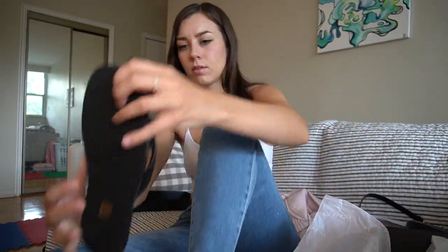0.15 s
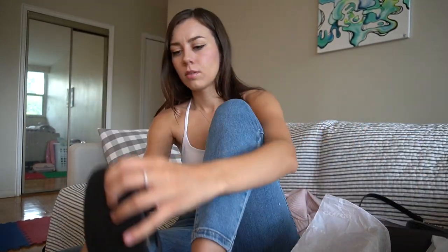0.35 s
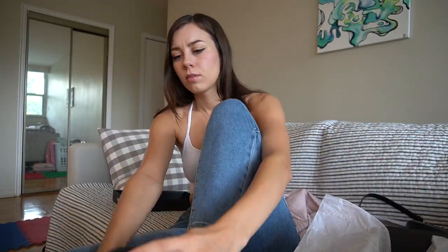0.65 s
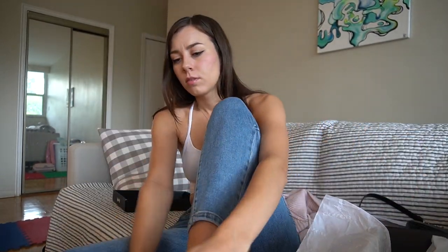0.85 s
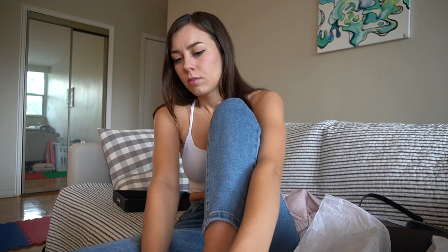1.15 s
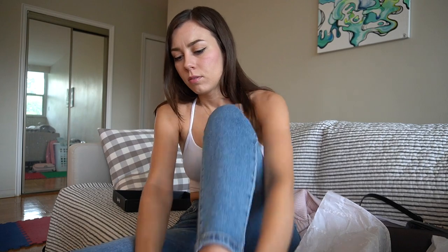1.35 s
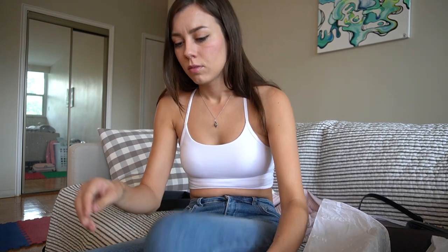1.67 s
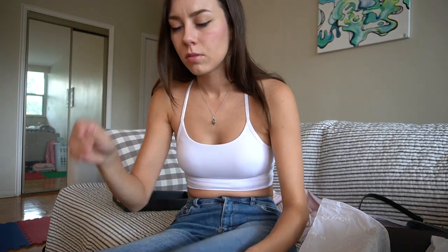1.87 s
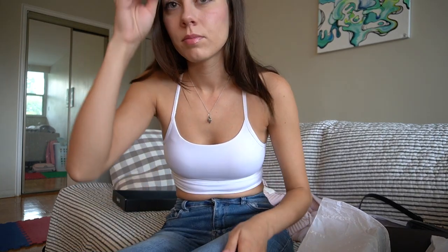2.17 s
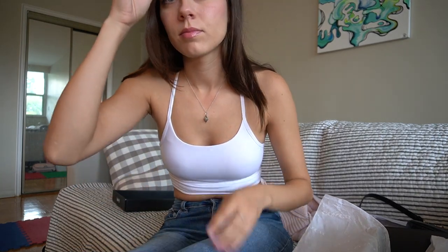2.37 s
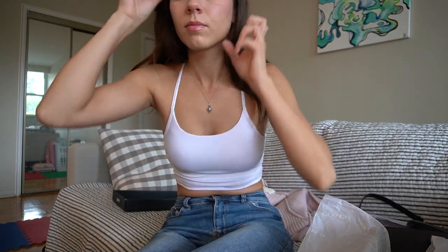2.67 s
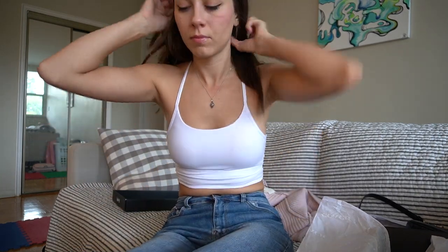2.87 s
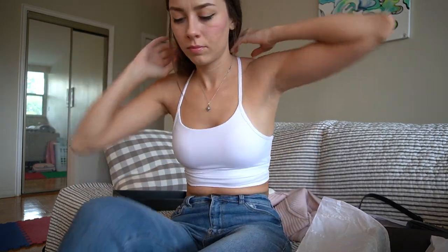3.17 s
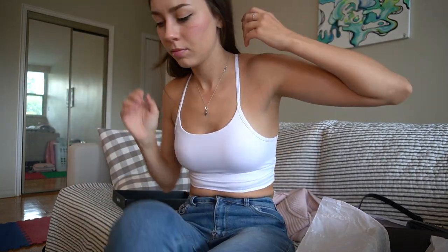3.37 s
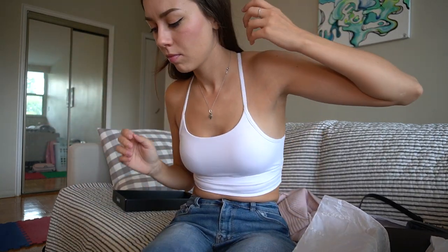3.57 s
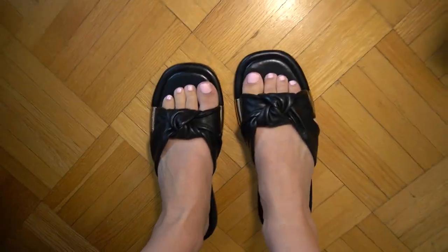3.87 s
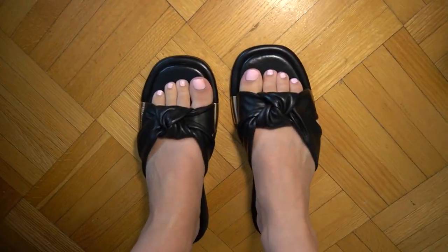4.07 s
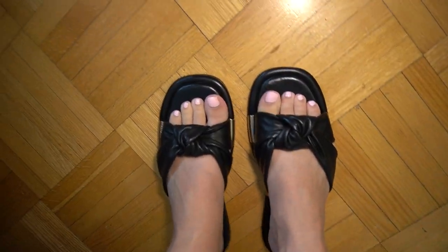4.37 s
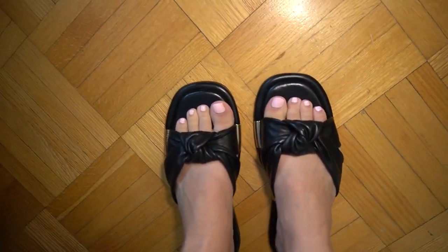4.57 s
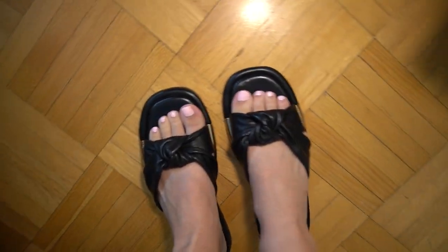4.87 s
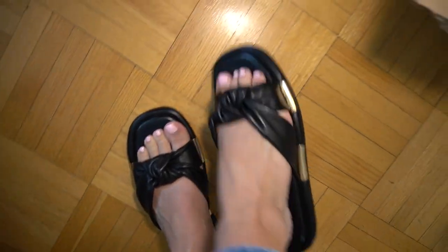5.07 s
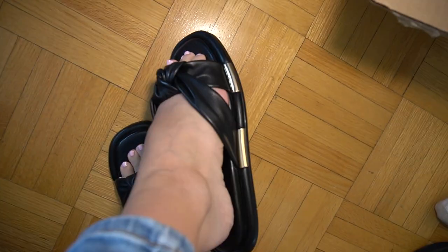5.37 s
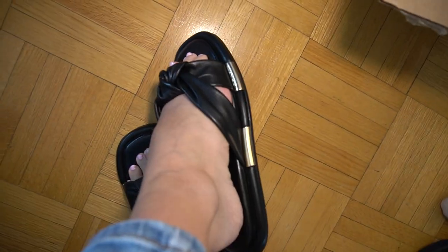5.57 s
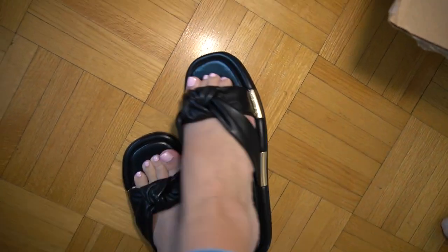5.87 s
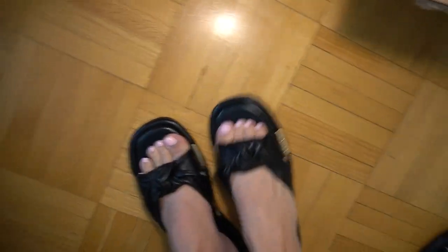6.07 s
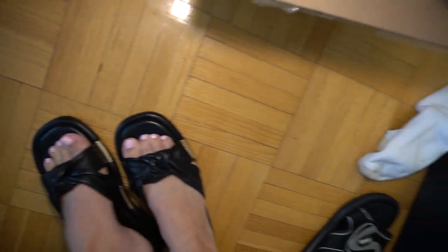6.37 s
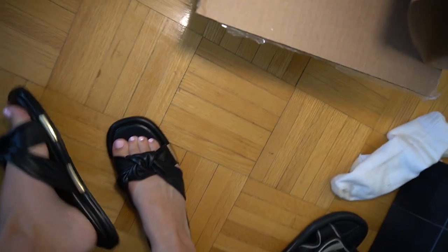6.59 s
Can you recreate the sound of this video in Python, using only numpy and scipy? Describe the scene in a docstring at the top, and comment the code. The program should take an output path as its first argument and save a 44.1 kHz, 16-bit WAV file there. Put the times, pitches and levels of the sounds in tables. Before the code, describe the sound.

Fairly close microphone indoors: dry fabric rubbing and tiny clicks, then several hard, flat sandal slaps on wood, the biggest near two seconds, with short bright room reverberation and lingering ringing. Quieter hair and cloth rustles lead to another clack. The sound switches abruptly to a hand-held camera, with deep swaying rumble and muffled bumps, sparse ticks, a sole slap and light shuffling.

```python
"""Cloth and hair rustle over a low rumble amid small ticks: someone on a sofa pulls on soft-soled sandals.
The soles then slap on a parquet floor and ring; the second sandal's slap fills the room with a noisy burst.
A second scene follows at once: a hand-held camera above the feet sways and rumbles as they brush and thud.
Rubbing is noise shaped by gestures; slaps are damped modes and sharp contacts in a dense reverberant room;
narrow-band noise sings, rings on or groans; a drone and hiss lie beneath."""
import sys
import numpy as np
from scipy import signal
from scipy.fft import rfft, irfft
from scipy.io import wavfile
from scipy.ndimage import uniform_filter1d

SR = 44100
rng = np.random.default_rng(int(sys.argv[2]) if len(sys.argv) > 2 else 0)


def dump(signal):
    """Clip the signal to [-1, 1] and save it as 16-bit WAV at the path in sys.argv[1]."""
    limited = np.clip(np.atleast_2d(signal).T, -1, 1)
    pcm = np.round(limited * 32767).astype(np.int16)
    wavfile.write(sys.argv[1], SR, pcm)


N = 296793
TIME = np.arange(N) / SR
CUT_S = 3.859  # the seated scene ends and the hand-held scene begins


def amp(db):
    """Level law: decibels become an amplitude ratio."""
    return 10 ** (np.asarray(db) / 20)


def unit(x):
    """Normalisation: scales a signal to rms 1."""
    return x / np.sqrt(np.mean(x ** 2) + 1e-20)


def read(points, hz):
    """Logarithmic frequency scale: interpolates a curve along it."""
    f, value = np.transpose(points)
    return np.interp(np.log(hz + 1), np.log(f), value)


def levels(rows):
    """Amplitude envelopes: one gain curve per dB column, silent outside the rows' span."""
    s, *columns = np.transpose(rows)
    inside = 1. * ((TIME > s[0] - .022) & (TIME < s[-1] + .022))
    inside = uniform_filter1d(inside, size=600)
    return [inside * amp(np.interp(TIME, s, db)) for db in columns]


def add(mix, s, sound):
    """Superposition: adds a sound into the mix from time s."""
    part = mix[max(round(s * SR), 0):][:len(sound)]
    part += sound[:len(part)]


def coloured(x, points):
    """Linear filtering: weights the spectrum of x, then scales it to rms 1."""
    gain = amp(read(points, np.fft.rfftfreq(len(x), 1 / SR)))
    return unit(irfft(rfft(x) * gain, len(x)))


def noise(points):
    """Stationary noise: white noise filtered to a spectrum, at rms 1."""
    return coloured(rng.standard_normal(N), points)


def ring(t, hz, t60, build_cycles=.5):
    """Damped mode: a sinusoid that builds up over its first cycles and decays exponentially."""
    t = np.maximum(t, 0)
    build_up = 1 - np.exp(-t * hz / build_cycles)
    return np.sin(2 * np.pi * hz * t) * amp(-60 * t / t60) * build_up


def crack(t, decay_s, low_hz, high_hz, grit):
    """Impulsive excitation: one sharp contact amid a dying spray of micro-contacts, band-limited."""
    burst = grit * rng.standard_normal(len(t)) * np.exp(-t / decay_s)
    burst[8] += 1  # the main contact
    band = [low_hz, min(high_hz, .45 * SR)]
    return unit(signal.sosfilt(signal.butter(2, band, "band", fs=SR, output="sos"), burst))


def swell(s, rise, fall):
    """Gesture envelope: a movement gathers speed until time s and then slows."""
    drop_db, shape = 10.5, 0.96  # the drop one rise before and one fall after the peak
    away = np.maximum((s - TIME) / rise, (TIME - s) / fall)
    gain, near = np.zeros(N), (away >= 0) & (away < 4)
    gain[near] = amp(-drop_db * away[near] ** shape)
    return gain


# Decay time of the room: (frequency [Hz], t60 [s])
ROOM_DECAY = [(200, 0.5), (1000, 0.34), (2500, 0.5), (5000, 0.5), (10000, 0), (16000, 1.4)]
# Spectrum of the room's reflections: (frequency [Hz], level [dB])
ROOM_SPECTRUM = [(150, 5), (500, -7.5), (1050, -3.5), (1450, -14), (1900, -0.5), (2400, 0), (3100, -6.5),
                 (4500, -0.5), (9000, 0), (16000, -5)]


def room(x):
    """Diffuse reverberation: dense random reflections, each band decaying at its own rate."""
    taps = rng.standard_normal(SR) * (np.arange(SR) > .006 * SR)
    hz, t, z = signal.stft(taps, SR, nperseg=256)
    early = 1 + 1.8 * np.exp(-t / 0.0044)
    decay_db = 60 * t / read(ROOM_DECAY, hz)[:, None]
    z = z * early * amp(read(ROOM_SPECTRUM, hz)[:, None] - decay_db)
    tail = signal.istft(z, SR, nperseg=256)[1]
    return signal.fftconvolve(x, tail / np.linalg.norm(tail))[:N]


# A sole slaps the floor: (time [s], direct peak level [dB], smack pitch [Hz], hollow ring re smack [dB],
# crack re smack [dB], time to roll flat [s], top of the crack, at least 2500 [Hz])
SOLE_SLAPS = [(1.1399, -6.5, 1470, -33, -1.5, 0.00065, 7540), (1.5984, -21.5, 610, -4, -18, 0.0017, 4000),
              (1.7898, -8, 1910, -18, -3, 0.00075, 8000), (1.7914, -0.5, 1740, -1.5, -3, 0.0013, 5000),
              (1.8244, 9, 1150, -9, -2.5, 0.001, 8200), (1.9618, -2.5, 1400, -21, -4, 0.00049, 7500),
              (1.9630, -10, 640, -3, -18, 0.00092, 3470), (2.1827, -5.5, 1540, 5.5, -7, 0.00086, 4000),
              (2.185, -3.5, 1240, 2, -11, 0.0022, 4260), (2.295, -15, 1700, -15, -7, 0.003, 4000),
              (2.299, -9, 1080, 15, -11, 0.0012, 4500), (2.407, -8.5, 1380, 3.5, -6, 0.0016, 5640),
              (2.479, -14.5, 1120, 6, -8, 0.0014, 5100), (2.5211, -2, 1100, 7.5, 5.5, 0.00037, 10000),
              (3.36, -13.5, 1030, -3, -21, 0.001, 4000), (3.3686, -10.5, 603, 8, -15, 0.0011, 4030),
              (3.489, -19, 810, -5, -18, 0.0026, 5000), (3.599, -17.5, 940, 9, 1, 0.0033, 7000),
              (3.7804, 4, 1120, 5, 2.5, 0.0017, 4480), (5.2045, 4, 1540, -12, -13.5, 0.00051, 4500),
              (5.972, -32, 700, -8, -22, 0.0011, 3500), (5.985, -32, 620, -14, -22, 0.0017, 3500),
              (6.0223, -25, 404, -6, -3, 0.0027, 3530), (6.205, -28, 770, -18, 0, 0.0023, 4000),
              (6.235, -21, 970, -25, -4, 0.0029, 4030), (6.2897, -17.5, 1110, -18, -9, 0.0011, 4500),
              (6.6732, -7.5, 710, 4, -19, .0007, 3520)]
# Modes of a sole on parquet: (frequency [Hz], level [dB], t60 [s])
SOLE_MODES = [(453, 5, 0.032), (592, 15.5, 0.01), (830, 12, 0.014), (1110, 8.5, 0.013), (1660, 3, 0.018),
              (2310, -2, 0.014)]
# Reflections of each slap from nearby furniture: (delay [s], level re direct [dB])
FURNITURE_ECHOES = [(.0055, -25), (.013, -28)]


def slaps(rows):
    """Impact and modal response: heel, arch and toe squeeze out air, the sole rings, its edge cracks."""
    landings = ((0, 1), (.42, .45), (1, 0.18))  # heel, arch, toe: (share of the roll, force)
    t, out = np.arange(2000) / SR, np.zeros(N)
    for s, db, hz, ring_db, crack_db, roll, top_hz in rows:
        smack = unit(sum(force * ring(t - lag * roll, hz, 5.15 / hz) for lag, force in landings))
        sole = unit(sum(amp(mode_db) * ring(t, f, t60) for f, mode_db, t60 in SOLE_MODES))
        edge = crack(t, decay_s=0.0017 + 0.46 * roll, low_hz=1870, high_hz=max(top_hz, 2500), grit=0.21)
        hit = smack + amp(ring_db) * sole + amp(crack_db) * edge
        add(out, s, amp(db) * hit / abs(hit).max())
    echoes = np.zeros(N)
    for delay, db in FURNITURE_ECHOES:
        add(echoes, delay, amp(db) * out)
    return out + echoes + amp(-8.5) * room(out)


# Straps, toes and sole edges tick; some rows are echoes and rings of slaps:
# (time [s], direct peak level [dB], pitch [Hz], crack re ring [dB], t60 of the ring [cycles])
SMALL_TICKS = [(0.038, -22, 3600, -6, 8), (.055, -20, 3900, -4, 7.1), (0.403, -35, 4500, -5, 8),
               (.483, -24, 3480, 1, 7.2), (0.491, -26, 5000, 8, 8), (.573, -39, 4000, 3, 8),
               (.767, -16, 2790, -7, 6.8), (.882, -14, 3740, -8, 6.8), (0.894, -11.5, 3830, -10, 6.6),
               (0.919, -12.5, 1610, 3, 7.9), (0.929, -17, 1660, -7, 6.5), (.963, -24, 1900, -5, 5.7),
               (.973, -23, 1650, -9, 6), (.988, -22, 1500, -5, 3.9), (1.041, -22, 900, -2, 4),
               (1.2540, -14, 1570, 5, 8.7), (1.356, -11, 7000, 0, 7.8), (1.3632, -3.5, 3560, 5, 16),
               (1.415, -17, 3000, 0, 6), (1.467, -25, 7500, 9, 7.3), (1.476, -23, 4050, 8, 8.7),
               (1.696, -27, 4000, 4, 8), (1.8126, -20.5, 5550, 7, 8), (1.835, -11, 6000, 4, 8),
               (1.8505, -8, 2300, 0, 6), (1.86, -5, 1300, -2, 6), (1.867, -9, 2700, -4, 6),
               (1.8925, -15, 2520, -4, 8), (2.028, -22, 6000, 2, 8), (2.224, -15, 4200, 25, 8),
               (2.394, -21, 3300, 7, 8), (2.662, -20, 4500, 5, 8), (2.685, -21, 4200, -2, 5.2),
               (2.7454, -12, 3320, 0.5, 13), (2.759, -14.5, 3060, -1, 13), (3.029, -14.5, 5700, -6, 6.6),
               (3.043, -18.5, 2900, 3, 10.3), (3.379, -22, 8000, 7, 5.5), (3.417, -22, 1490, -16, 7.2),
               (3.768, -9.5, 7000, 11, 8), (3.794, -11, 7800, -8, 9.3), (3.8564, -3, 2620, -1, 9.3),
               (4.2255, -23, 4500, 2, 4.1), (4.9782, -13, 7500, 5, 9), (5.001, -14, 2440, 13, 8),
               (5.009, -20, 11500, 4, 8), (5.2085, -17, 1880, -15, 16), (5.2158, -15, 2890, -7, 17),
               (5.2185, -20, 1850, -10, 15), (5.515, -29, 5000, 2, 8), (5.5306, -23.5, 2950, 5, 8),
               (5.7290, -17.5, 1820, 8, 5.3), (6.021, -20, 1530, 4, 9.6), (6.1431, -20, 1320, -21, 8.4),
               (6.154, -16.5, 1700, -17, 5.3), (6.183, -18, 1500, -4, 6), (6.324, -27, 7040, 11, 6.7),
               (6.342, -16.5, 2640, -8, 7.3), (6.418, -6, 4250, -10, 11), (6.575, -24, 5800, -9, 12),
               (6.615, -26, 5900, -7, 12), (6.6494, -17, 2710, -14, 7.7), (6.7053, -17.5, 1840, -1, 9.5)]


def ticks(rows):
    """Damped mode with a contact transient: a short ring and a crack; a longer ring starts more softly."""
    t, out = np.arange(800) / SR, np.zeros(N)
    for s, db, hz, crack_db, cycles in rows:
        tone = unit(ring(t, hz, cycles / hz, build_cycles=0.13 * cycles))
        contact = crack(t, decay_s=0.003, low_hz=1720, high_hz=10600, grit=0.18)
        tick = tone + amp(crack_db) * contact
        add(out, s, amp(db) * tick / abs(tick).max())
    return out + amp(-20.0) * room(out)


# Dull bumps of feet on the floor, weight on the sofa and hands on the camera:
# (time [s], direct peak level [dB], pitch [Hz], t60 of the swing [cycles])
DULL_BUMPS = [(0.427, -26.5, 70, 5.9), (2.235, -13, 122, 18), (2.29, -14, 104, 8.4), (2.308, -17, 162, 18),
              (2.415, -21, 188, 19), (4.146, -20.5, 66, 5.9), (4.434, -8.5, 57.3, 4.6),
              (4.645, -11, 65.6, 8.4), (4.731, -31, 370, 7.3), (4.872, -12, 60.7, 7.7),
              (5.015, -17, 69, 11), (5.2046, -18, 134, 3.2), (5.972, -14.5, 79, 6), (6.021, -5, 72.3, 5),
              (6.022, -11.5, 155, 4.4), (6.318, -23, 79, 5.7), (6.67, -27, 169, 4.8)]


def thuds(rows):
    """Low-frequency damped oscillation: a soft bump swings for a few cycles."""
    t, out = np.arange(SR // 3) / SR, np.zeros(N)
    for s, db, hz, cycles in rows:
        swing = ring(t, hz, cycles / hz)
        add(out, s, amp(db) * swing / abs(swing).max())
    return out + amp(-21.0) * room(out)


def grains(grains_per_s, spread_db, smooth, clump_db):
    """Granular noise: countless uneven grains, as of tiny slips, clump together over a smooth hiss."""
    sizes = amp(spread_db * np.minimum(rng.exponential(1, N), 4)) * rng.choice([-1, 1], N)
    impulses = unit(sizes * (rng.random(N) < grains_per_s / SR))
    clumps = noise([(5, 6.0), (40, -6.0), (120, -11), (400, -59), (2000, -90)])
    return (impulses + smooth * rng.standard_normal(N)) * amp(clump_db * clumps)


# The noisy burst as the second sandal slaps down, before a 1 dB lift: (time [s], level [dB])
BURST_LEVEL = [(1.821, -29.5), (1.828, -15), (1.844, -23.5), (1.851, -13.5), (1.862, -17.5), (1.88, -20),
               (1.92, -23.5), (1.97, -28.5), (2.08, -38.5)]
# Spectrum of the burst: (frequency [Hz], level [dB])
BURST_SPECTRUM = [(200, -16), (380, -11), (540, 0.5), (800, -2.5), (1100, 1.5), (1500, 0.5), (2500, -2.5),
                  (4100, -4.5), (7800, -10.5), (11000, -19.5), (16000, -45)]


def slap_burst():
    """Diffuse decay: the second sandal slaps down and its noisy reverberation fills the room."""
    fuzz = grains(grains_per_s=2200, spread_db=4, smooth=0.92, clump_db=1.0)
    out = levels(BURST_LEVEL)[0] * coloured(fuzz, BURST_SPECTRUM)
    return amp(1.0) * out + amp(-13.5) * room(out)


def shifting(x, patchy_db):
    """Time-varying filtering: as the contact moves, colour drifts in patches about a kilohertz wide."""
    z = signal.stft(x, SR, nperseg=256)[2]
    patches = uniform_filter1d(rng.standard_normal(z.shape), size=5, axis=0)
    patches = unit(uniform_filter1d(patches, size=22, axis=1))
    return signal.istft(z * amp(patchy_db * patches), SR, nperseg=256)[1][:N]


# Strokes of cloth, skin or leather, before a 2 dB cut: (fastest moment [s], rise [s], fall [s],
# rustle level [dB], brushing re rustle [dB], fizz re rustle [dB])
RUB_STROKES = [(.07, 0.067, 0.14, -38, -2.5, -3.5), (.47, 0.063, 0.042, -42.5, -20, -4),
               (.78, 0.11, 0.14, -31, -22, -1.5), (.86, 0.075, 0.077, -36.5, -7, -2.5),
               (1.025, 0.078, 0.053, -34, -3.5, -2.5), (1.151, 0.1, 0.067, -37, -5, -14),
               (1.312, 0.031, 0.035, -31.5, -4.5, 1.5), (1.359, 0.019, 0.016, -27, -24, 5.5),
               (1.41, 0.091, 0.083, -32.5, -5, -0.5), (1.56, 0.032, 0.015, -30.5, -24, -0.5),
               (2.08, 0.093, 0.24, -40.5, -5, -2), (2.34, 0.5, 0.83, -41.5, 8, -6.5),
               (2.56, 0.026, 0.081, -41, -9, -20), (2.685, 0.023, 0.013, -31, -11, 1),
               (2.76, 0.026, 0.056, -37.5, 2, -3), (3.04, 0.072, 0.078, -45.5, 4.5, 0),
               (3.295, 0.066, 0.12, -36.5, 0.5, -8), (3.496, 0.05, 0.1, -33, 5, 2),
               (3.56, 0.065, 0.1, -35, 3, -8), (3.735, 0.095, 0.097, -28.5, -0.5, -2),
               (3.85, 0.1, 0.1, -22.5, -1.5, -4), (4.228, 0.064, 0.074, -42.5, -6.5, -6),
               (4.42, 0.11, 0.11, -45, -4, 5), (4.7, 0.28, 0.35, -53.5, -6, -4.5),
               (4.976, 0.079, 0.039, -33, -2.5, -3.5), (5.085, 0.077, 0.11, -39, -5.5, -1),
               (5.24, 0.035, 0.16, -45.5, 3, -2), (5.5, 0.31, 0.095, -48, -1, -1.5),
               (5.97, 0.16, 0.21, -49.5, 0, -0.5), (6.177, 0.048, 0.03, -30.5, -8.5, -10),
               (6.345, 0.028, 0.04, -37.5, 0, 9.5), (6.408, 0.027, 0.013, -26.5, -1, 4),
               (6.47, 0.15, 0.17, -39, -2, -6), (6.6, 0.056, 0.017, -42.5, -4, 6.5),
               (6.67, 0.094, 0.077, -39, -9, -5)]
# Spectra of coarse brushing, finer rustle and finest fizz: (frequency [Hz], level [dB])
BRUSH_SPECTRUM = [(150, -25), (320, -3), (530, 0), (770, -5), (1120, -1.5), (1500, -4), (1900, -11),
                  (3500, -35)]
RUSTLE_SPECTRUM = [(700, -33), (1300, -14), (1800, 0), (2800, 2.5), (4400, 2), (5800, -3), (9000, -24.5)]
FIZZ_SPECTRUM = [(3500, -16.5), (5800, -12), (7800, 0.5), (10000, -4), (13000, -7), (14800, -18),
                 (16000, -43)]
# Faint rubbing that never stops, before the same cut: (brushing [dB], rustle [dB], fizz [dB])
SEATED_STIR, HELD_STIR = (-47, -50, -53.5), (-54, -56.5, -65)
CATCHES_PER_S, CATCH_DB = 33, -18.5  # stray snaps; their rms level before colouring


def rubbing(strokes, stir_db, wet_db):
    """Power addition: strokes swell out of a faint stir as slips brush, rustle and fizz, and some snap."""
    power = amp(stir_db)[:, None] ** 2 * np.ones(N)
    for s, rise, fall, db, brush_db, fizz_db in strokes:
        stroke_gain = amp([db + brush_db, db, db + fizz_db])
        power += np.outer(stroke_gain ** 2, swell(s, rise, fall) ** 2)
    brush, rustle, fizz = np.sqrt(power)
    coarse = grains(grains_per_s=700, spread_db=4.5, smooth=1.55, clump_db=2.6)
    fine = grains(grains_per_s=1400, spread_db=3, smooth=1.5, clump_db=2.0)
    snaps = (rng.random(N) - .5) * (rng.random(N) < CATCHES_PER_S / SR)
    catches = amp(CATCH_DB) * unit(snaps)
    out = brush * coloured(coarse + catches, BRUSH_SPECTRUM)
    out = out + rustle * coloured(unit(coarse + fine) + catches, RUSTLE_SPECTRUM)
    out = out + fizz * coloured(fine + catches, FIZZ_SPECTRUM)
    out = amp(-2.0) * shifting(out, patchy_db=1.3)
    return out + amp(wet_db) * room(out)


# Narrow-band sounds, being rubs that sing, slaps that ring on and a low groan:
# (time [s], length [s], level [dB], first pitch [Hz], last pitch [Hz], bandwidth [Hz])
NARROW_BANDS = [(0.027, 0.078, -47, 3000, 4570, 1210), (.08, 0.061, -44.5, 2900, 1940, 690),
                (.6, 0.14, -42, 4260, 4280, 1830), (0.745, 0.07, -36.5, 1350, 1200, 490),
                (.95, 0.12, -46, 1500, 1990, 703), (1.05, 0.18, -49, 4450, 4350, 600),
                (1.378, 0.052, -42, 680, 820, 250), (2.185, 0.052, -37, 1766, 1750, 170),
                (2.183, 0.88, -56, 2470, 2320, 352), (2.202, 0.63, -54, 1152, 1050, 297),
                (2.32, 0.11, -33, 200, 190, 49.7), (2.3, .64, -46.5, 920, 880, 130),
                (2.42, .52, -48.5, 2270, 2220, 110), (3.27, 0.066, -39.5, 1450, 2100, 700),
                (3.501, 0.098, -34, 1327, 1280, 149), (3.693, 0.095, -28.5, 1900, 2397, 1090),
                (3.794, 0.034, -26.5, 1153, 1057, 250), (4.202, 0.15, -46, 12100, 11600, 3000),
                (4.256, .07, -49.5, 4350, 4350, 450), (4.302, 0.17, -48, 7400, 8000, 840),
                (4.471, .18, -51, 7460, 5340, 3200), (5.068, 0.071, -43.5, 1020, 900, 110),
                (5.124, 0.077, -43.5, 734, 536, 91), (5.205, 0.087, -48, 3200, 3000, 700),
                (5.208, 0.1, -47, 1880, 1840, 298), (6.14, 0.085, -38, 1490, 948, 507),
                (6.431, 0.051, -36, 1020, 1216, 560), (6.475, 0.05, -44, 870, 685, 200),
                (6.568, 0.054, -43.5, 3150, 3490, 700)]


def narrow_bands():
    """Narrow-band noise: rubs that sing, slaps that ring on, a low groan; pitch wavers, level flutters."""
    out = np.zeros(N)
    waver = noise([(5, -0.5), (25, 0), (80, -37), (400, -100)])
    flutter = noise([(10, -5), (90, 8), (250, -40), (1000, -100)])
    for s, length, db, first_hz, last_hz, width in NARROW_BANDS:
        n, start = int(length * SR), max(int(s * SR), 0)
        span = slice(start, start + n)
        lowpass = signal.butter(2, width / 2, fs=SR, output="sos")
        fuzz = signal.sosfilt(lowpass, rng.standard_normal((2, n)))
        hz = np.geomspace(first_hz, last_hz, n) + 0.14 * width * waver[span]
        # a complex carrier moves the low-pass noise up to the gliding pitch
        carrier = np.exp(2j * np.pi * np.cumsum(hz) / SR)
        tone = ((fuzz[0] + 1j * fuzz[1]) * carrier).real
        tone = tone * amp(1.7 * flutter[span])
        add(out, s, amp(db) * unit(tone * signal.windows.tukey(n, .8)))
    return out


# Shifting weight makes sofa and floor boom: (peak time [s], rise [s], fall [s], level [dB])
WEIGHT_BOOMS = [(2.29, 0.053, 0.18, -23.5), (3.15, 0.21, 0.35, -34), (3.8, 0.03, 0.15, -25),
                (6.025, 0.0075, 0.016, -30)]
# Spectrum of the boom: (frequency [Hz], level [dB])
BOOM_SPECTRUM = [(60, -33), (110, 2), (140, -1.5), (210, -3), (290, -9), (600, -66)]


def booms(rows):
    """Low-band resonance: a hollow boom swells and dies as weight shifts."""
    gain = sum(amp(db) * swell(s, rise, fall) for s, rise, fall, db in rows)
    return noise(BOOM_SPECTRUM) * gain


# The hand-held camera, before a 1.5 dB cut of the sway and a 3 dB lift of the rumble:
# (time [s], slow sway level [dB], rumble level [dB])
HELD_MOTION = [(3.87, -10.5, -34), (3.96, -11.5, -33), (4.21, -16, -27.5), (4.76, -4, -25),
               (4.8, -12.5, -28.5), (5.14, -7, -25.5), (5.8, -16.5, -32.5), (6.04, -9, -20.5),
               (6.15, -2.5, -29.5), (6.39, -19, -29.5), (6.51, -7, -32.5), (6.73, -19.5, -32)]


def sway():
    """Frequency modulation: the hands rock the microphone at a wandering rate around 16 Hz."""
    wander = noise([(3, 0), (14, -1), (30, -12.0), (100, -29), (400, -120)])
    hz = 16 * amp(2.7 * wander)
    return amp(-1.5) * levels(HELD_MOTION)[0] * np.sin(2 * np.pi * np.cumsum(hz) / SR)


# Spectrum of the hand-held rumble: (frequency [Hz], level [dB])
HAND_SPECTRUM = [(20, -1), (30, -8.5), (42, -4.5), (60, -3.5), (80, 1.5), (96, -20), (140, -21.5),
                 (300, -32.5), (700, -102)]


def hand_rumble():
    """Structure-borne noise: the grip on the camera rumbles through its body."""
    return amp(3.0) * levels(HELD_MOTION)[1] * noise(HAND_SPECTRUM)


# Spectrum of the stand rumble: (frequency [Hz], level [dB])
STAND_SPECTRUM = [(9, -2), (15, 8.5), (27, -13), (40, -1), (58, 0), (80, -15), (110, -21), (150, -53),
                  (240, -75)]
# Steady level [dB]; jostling of the sofa: (peak time [s], rise [s], fall [s], level [dB])
STAND_DB, JOSTLE = -37.5, (2, 0.3, 1.9, -25.5)


def stand_rumble():
    """Structure-borne noise: the camera's stand carries a steady rumble, more as the sofa is jostled."""
    s, rise, fall, db = JOSTLE
    gain = np.hypot(amp(STAND_DB), amp(db) * swell(s, rise, fall))
    return gain * noise(STAND_SPECTRUM)


# Spectrum of the room's drone: (frequency [Hz], level [dB])
DRONE_SPECTRUM = [(60, 3.5), (110, -1.5), (160, -4), (200, 1), (225, -1.5), (247, 6.5), (270, -2),
                  (300, -4.5), (400, -12), (800, -14.5), (2000, -40)]


def drone(db):
    """Stationary low-frequency noise: the steady drone of the room."""
    return amp(db) * noise(DRONE_SPECTRUM)


# Spectrum of the background hiss: (frequency [Hz], level [dB])
HISS_SPECTRUM = [(180, -9), (300, -6), (450, -10), (750, -3.5), (1200, -39), (1700, -36), (2080, -2),
                 (2400, -42), (8000, -18.5), (16000, -26)]


def hiss():
    """Stationary noise floor: a faint coloured hiss."""
    return amp(-58.5) * noise(HISS_SPECTRUM)


def before_cut(rows):
    """Time ordering: the events of the seated scene."""
    return [row for row in rows if row[0] < CUT_S]


def after_cut(rows):
    """Time ordering: the events of the hand-held scene."""
    return [row for row in rows if row[0] >= CUT_S]


def scene():
    """Superposition: a rapid crossfade joins two scenes; narrow-band sounds and hiss occur in both."""
    seated = rubbing(before_cut(RUB_STROKES), stir_db=SEATED_STIR, wet_db=-10.5)
    seated = seated + slap_burst() + booms(before_cut(WEIGHT_BOOMS)) + stand_rumble() + drone(db=-36.5)
    held = rubbing(after_cut(RUB_STROKES), stir_db=HELD_STIR, wet_db=-13.0)
    held = held + booms(after_cut(WEIGHT_BOOMS)) + sway() + hand_rumble() + drone(db=-43)
    for source, table in ((slaps, SOLE_SLAPS), (ticks, SMALL_TICKS), (thuds, DULL_BUMPS)):
        seated = seated + source(before_cut(table))
        held = held + source(after_cut(table))
    after = uniform_filter1d(1. * (TIME > CUT_S), size=60)
    mix = (1 - after) * seated + after * held
    return (mix + narrow_bands() + hiss())[None]


def record(dry):
    """Saturation and band limit: peaks beyond full scale clip, then a low-pass filter acts at 16.5 kHz."""
    lowpass = signal.firwin(801, 16500, window=("kaiser", 8), fs=SR)
    return signal.oaconvolve(np.clip(dry, -1, 1), lowpass[None], "same")


dry = scene()
out = record(dry)
dump(out)
```